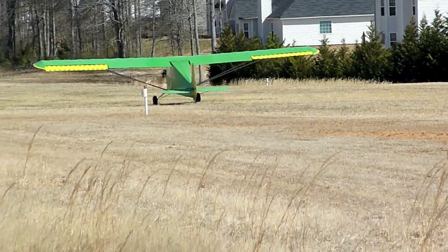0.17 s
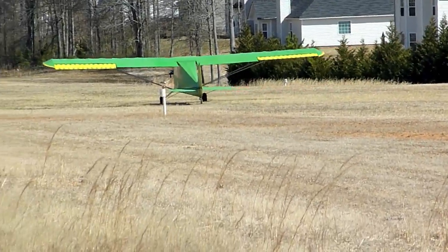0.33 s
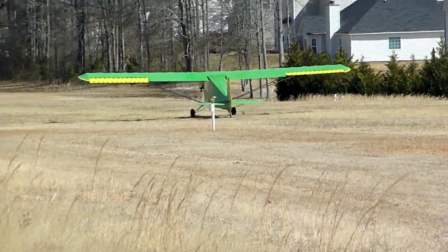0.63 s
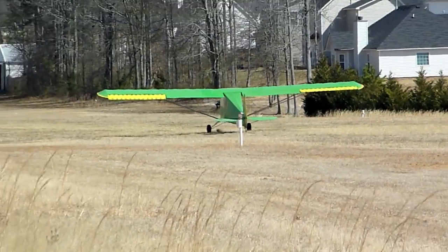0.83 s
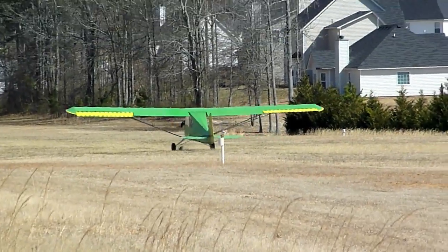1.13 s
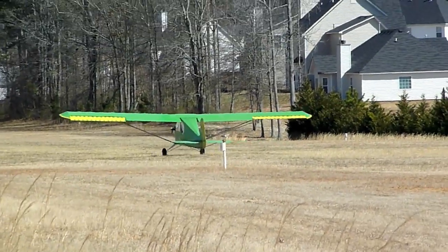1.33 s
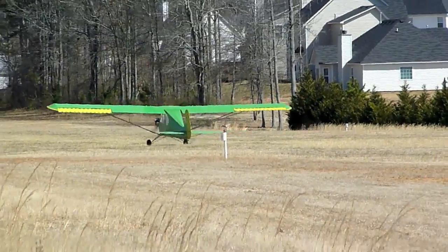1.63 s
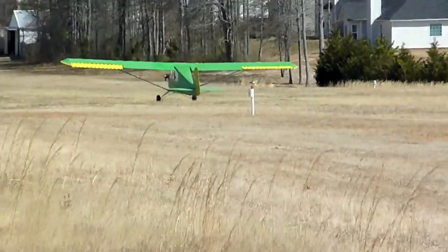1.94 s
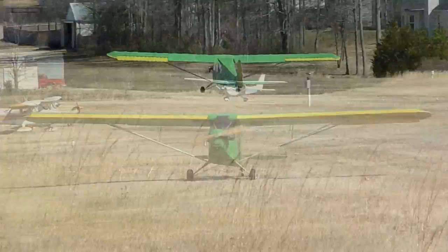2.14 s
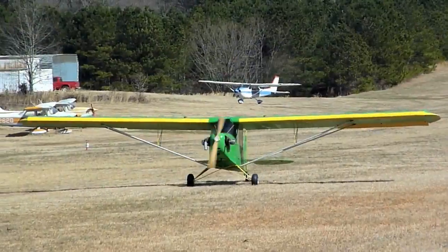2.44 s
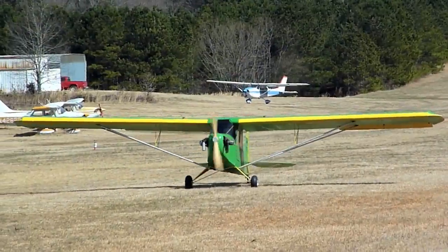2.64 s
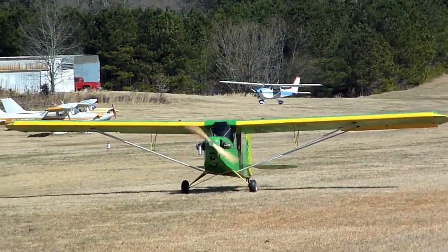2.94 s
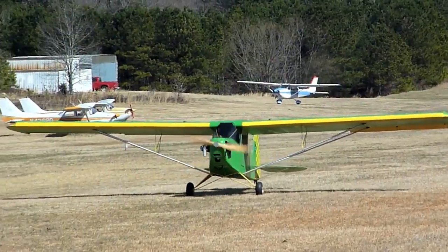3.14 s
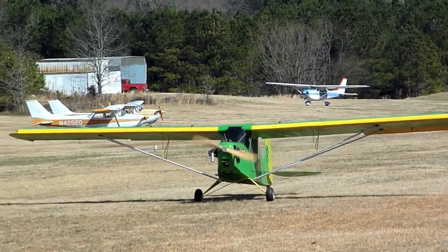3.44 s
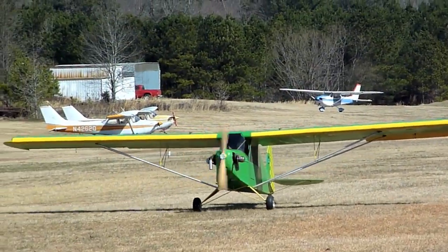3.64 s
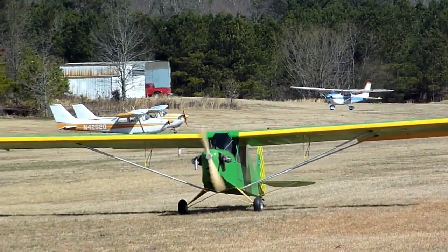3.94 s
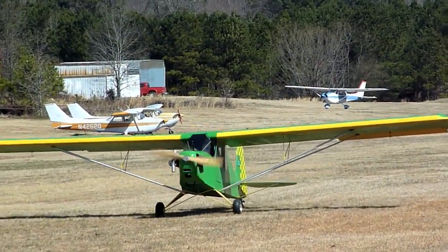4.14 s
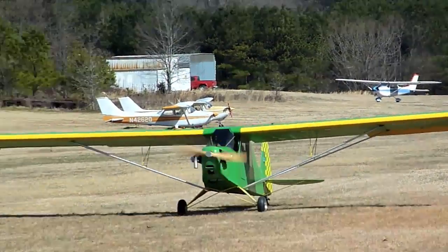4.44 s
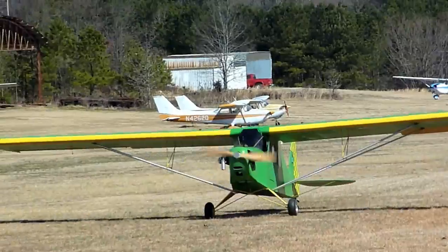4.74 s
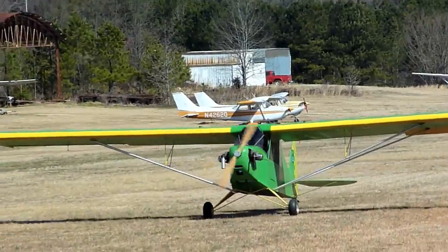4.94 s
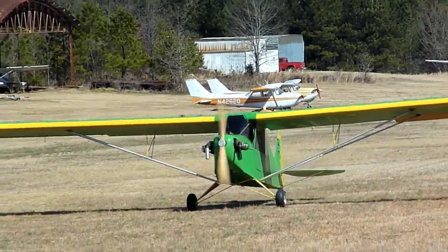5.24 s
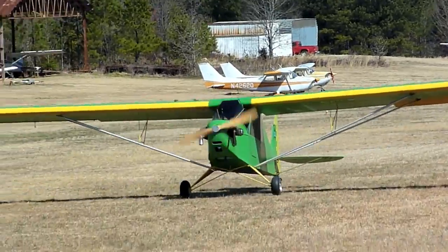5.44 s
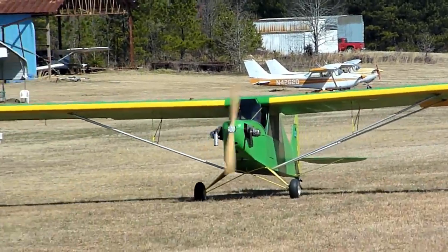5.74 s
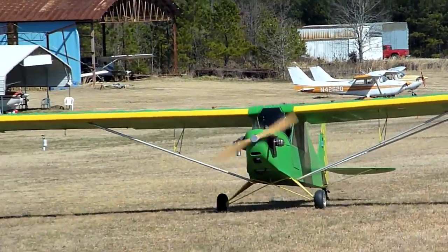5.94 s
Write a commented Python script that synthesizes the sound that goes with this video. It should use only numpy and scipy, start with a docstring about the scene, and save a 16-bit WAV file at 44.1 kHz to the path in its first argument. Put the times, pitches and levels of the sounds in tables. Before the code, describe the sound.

Far-off low engine thumping slows slightly, then switches to a nearer, brighter idling propeller plane that grows louder and crackly, with wind rumble and a knock.

```python
"""Dull, far-off thumping comes first: a light aircraft idling on a grass strip, tail-on, then nose-on and close.
Each firing of its four cylinders is a low pressure thump that sweeps upward and a short hiss of exhaust gas.
Rattling valve gear is whirring noise and gated ticks; propeller wash is noise that pulses with the firings.
Behind it, low-frequency noise gusts buffet the microphone, a faint airy hiss stays, and its case is knocked."""
import sys
import numpy as np
from scipy import signal
from scipy.fft import rfft, irfft, next_fast_len
from scipy.io import wavfile
from scipy.ndimage import uniform_filter1d, map_coordinates

SR = 44100
rng = np.random.default_rng(int(sys.argv[2]) if len(sys.argv) > 2 else 0)


def transcribe(signal):
    """Save signal, clipped to [-1, 1], as a 16-bit WAV file at the path in sys.argv[1]."""
    frames = np.atleast_2d(signal).T
    limited = np.clip(frames, -1, 1)
    pcm = np.round(limited * 32767).astype(np.int16)
    wavfile.write(sys.argv[1], SR, pcm)


N = 268994
TIME = np.arange(N) / SR  # s

# engine speed: t/s, firing rate/Hz
FIRING_RATE = [(0, 32.9), (.2, 29.3), (.33, 28.5), (.5, 27.97), (.85, 27.38), (1.95, 27.06), (2.1, 24.89),
               (2.5, 24.83), (2.9, 25.5), (3.2, 25.05), (3.5, 25.33), (3.8, 26.67), (4.1, 27.2),
               (4.9, 27.28), (6.1, 26.26)]
# exhaust thump level, which the propeller wash follows: t/s, level/dB
THUMP_LEVEL = [(0.0, -36), (0.39, -38.5), (1.19, -39), (1.27, -39.5), (1.95, -38), (2.14, -42), (2.51, -35),
               (4.13, -31), (5.78, -32.5), (6.01, -30.5), (6.1, -31)]
# in firing order, two from each bank in turn:
# thump level/dB, spit level/dB, exhaust delay/s, rocker tick delay/s, valve seating level/dB (all levels relative)
CYLINDER_TRAITS = [(-3, 2, -.0003, 0.0096, 2.5), (-3.5, 3, .00035, 0.0124, -3), (-3, 2, .00025, .012, -3),
                   (-3.5, 2.5, -.00025, 0.0112, 1.5)]
# thump colour from behind, from in front at idle, and with a little throttle:
# f/(multiple of the firing rate), relative level/dB
THUMP_BEHIND_ORDERS = [(1, -28), (2, -13.5), (3, -4), (4, -2.5), (5, -2), (6, -2), (7, 1.5), (8, -4),
                       (9, -14.5), (10, -3.5), (11, -11), (12, -14.5), (13, -20), (14, -17), (15, -38),
                       (17, -34)]
THUMP_IDLE_ORDERS = [(1, -30), (2, -23), (3, -15), (4, -12), (5, -4.5), (6, -1), (7, -1), (8, -4), (9, 2),
                     (10, -7.5), (11, -3), (12, -4.5), (13, -2), (14, -14), (15, -18.5), (16, -17),
                     (17, -27), (18, -35)]
THUMP_OPEN_ORDERS = [(1, -31), (2, -18), (3, -14.5), (4, -7), (5, -3), (6, 0), (7, 0), (8, -3), (9, -2.5),
                     (10, -2), (11, -3.5), (12, -10), (13, -4.5), (14, -9.5), (15, -25), (16, -18),
                     (17, -32), (18, -45)]
# engine treble level, shared by machinery and ordinary spits: t/s, level/dB
TREBLE_LEVEL = [(0, -73.5), (.5, -81), (1.45, -101), (2.1, -77), (2.4, -63), (2.75, -51.5), (3.3, -57),
                (4.2, -50.5), (4.55, -52), (4.92, -47.5), (5.55, -49), (6.1, -50)]
# firings whose spit stands out as a crack: t/s, level/dB, treble tilt/dB
CRACKING_SPITS = [(2.53, -52.5, 1), (2.61, -49, -2), (2.77, -46, -11), (2.809, -46.5, 0),
                  (2.888, -44.5, -6), (2.966, -46.5, -5), (3.522, -46, -4), (4.088, -43.5, 0),
                  (4.161, -42, 4), (4.235, -45.5, 8), (4.308, -45.5, 5), (4.345, -43, 9), (4.418, -44.5, 3),
                  (4.602, -45.5, -9), (4.749, -41, 0), (4.822, -40.5, 5), (4.895, -37, 2),
                  (4.932, -39.5, 0), (4.969, -41.5, 3.5), (5.006, -40.5, 0), (5.042, -38.5, 4.5),
                  (5.079, -39, 2.5), (5.116, -39, 4), (5.153, -41, 5), (5.19, -40, -2.5), (5.227, -39, 6),
                  (5.301, -41, -1.5), (5.375, -41, -5.5), (5.525, -40, -3), (5.6, -41.5, -2),
                  (5.901, -43, 0.5)]
# clearly audible tappet clicks: t/s, level/dB
TAPPET_CLICKS = [(.015, -56), (0.073, -54), (.125, -61), (.26, -61), (.33, -70), (.395, -63), (.459, -57.5),
                 (.535, -60), (.6, -61), (.742, -61), (.805, -63), (.955, -62), (1.61, -62), (1.755, -62),
                 (1.905, -60), (1.981, -59)]
# gusts on the microphone: t/s, half length/s, level/dB
GUST_SWELLS = [(0.53, 0.079, -39), (0.76, 0.098, -37.5), (1.02, 0.068, -40.5), (2.58, 0.2, -40),
               (2.72, 0.04, -38), (2.964, 0.063, -34.5), (3.403, 0.37, -41.5), (4.197, 0.065, -46),
               (4.82, 0.022, -33.5), (5.27, 0.077, -36), (5.572, 0.044, -38.5), (5.932, 0.14, -37.5)]
# small knocks on the microphone's case: t/s, rms level over 10 ms/dB, ring f/Hz, t60/s
CASE_KNOCKS = [(2.031, -49.5, 1630, 0.013), (3.8017, -35.5, 1370, 0.02), (5.904, -50.5, 1450, 0.0055)]
# noise colours of the gas jets, gears, valve covers, propeller wash, passing hiss, wind and open air:
# f/Hz, relative level/dB
SPIT_COLOUR = [(500, -27), (1500, -10.5), (2300, -2.5), (3100, 4), (3800, 3.5), (5200, -1), (6300, -0.5),
               (7000, -6.5), (10000, -11), (14000, -18.5), (16000, -30)]
GEAR_COLOUR = [(700, -13), (1800, -8), (2400, 1.5), (2900, -0.5), (3700, 3.5), (4400, -1.5), (6300, -6),
               (7800, -9.5), (10200, -12.5), (14000, -19), (16000, -47)]
VALVE_COVER_COLOUR = [(1500, -24), (2400, -7.5), (3000, -7), (3400, 3), (3660, 5.5), (4100, -7.5),
                      (6300, -15.5), (10000, -23.5), (15000, -42)]
WASH_COLOUR = [(200, -1.5), (420, 5.5), (580, -3.5), (800, 2), (1000, -4), (1400, -5), (1900, -9),
               (3000, -25), (8000, -28)]
SIZZLE_COLOUR = [(6000, -10), (8700, 0), (10700, -2), (12300, -19), (16000, -30)]
WIND_COLOUR = [(15, -55), (26, -34), (36, -9), (58, -5.5), (100, -3), (150, -4.5), (260, -14.5),
               (380, -26.5), (700, -43), (1500, -68)]
AIR_COLOUR = [(100, -23), (650, 8.5), (950, 0), (1250, 5.5), (1700, -3.5), (2500, -2.5), (4500, -6),
              (10000, -12), (14000, -14.5), (16000, -38)]
# narrow dips in the microphone's response: f/Hz, width/Hz, depth/(0 to 1)
MICROPHONE_DIPS = [(4690, 1800, 0.2), (5860, 120, 0.33), (7920, 290, 0.83)]

IDLE_HZ = 23.84  # firing rate from which wash and spit brightness grow
SPIT_DB = 1.5  # ordinary spits, over the engine treble
SPIT_BRIGHT_DB, SPIT_BRIGHT_DB_PER_HZ = -6, 1.5  # treble tilt, and its growth per extra firing a second
SPIT_BEHIND_BRIGHT_DB = 9  # extra treble tilt from behind
WHIRR_DB, VALVES_DB = -1, -6  # gears and valve ticks within the engine treble
VALVE_SEAT_S = 0.0276  # a valve seats this long after a firing
WASH_BEHIND_DB, WASH_AHEAD_DB = -23, -20.5  # wash over thump, tail-on and nose-on at idle
WASH_DB_PER_HZ = 0.57  # nose-on growth per extra firing a second
SIZZLE_S, SIZZLE_HALF_S, SIZZLE_DB = 2.545, 0.3, -59.5  # peak time, half length, level
BREEZE_DB, BREEZE_SWING_DB = -46.5, 1  # the buffeting between gusts
GROUND_LAG_S = .001319  # extra path of the turf reflection
TOP_HZ = 15600  # microphone's upper limit


def exhaust(count, cylinder_db, delay, level_db):
    """Dull thumps from behind the aircraft give way to brighter ones from in front, fuller as the throttle opens."""
    # the tail-on layer fades out at a steady speed
    held_rate = np.interp(np.minimum(TIME, 1.95), *np.transpose(FIRING_RATE))
    held_count = np.cumsum(held_rate) / SR
    behind = thumps(held_count, cylinder_db, delay, THUMP_BEHIND_ORDERS,
                    jitter=0.0044, lead=0.1113, sweep=0.0528, echo_db=-9.5)
    idle = thumps(count, cylinder_db, delay, THUMP_IDLE_ORDERS,
                  jitter=0.0046, lead=0.1616, sweep=0.0552, echo_db=-9.5)
    opened = thumps(count, cylinder_db, delay, THUMP_OPEN_ORDERS,
                    jitter=0.003, lead=0.155, sweep=0.054, echo_db=-18)
    airframe_shade = [(240, 0), (285, -1), (330, -6.5), (600, -10)]
    behind = unit(filtered(behind, lambda hz: colour(airframe_shade, hz)))
    near = facing(TIME)
    throttle = np.interp(TIME, [3.45, 4.0], [0, 1])
    ahead = (1 - throttle) * idle + throttle * opened
    return amp(level_db) * (np.sqrt(1 - near) * behind + np.sqrt(near) * ahead)


def thumps(count, db, delay, orders, jitter, lead, sweep, echo_db):
    """Exhaust pressure waves, fixed in crank angle; delay is in seconds, jitter and lead in firing periods."""
    period = TIME[-1] / count[-1]
    size, shift, echo_shift = rng.standard_normal((len(db), 3)).T
    at = np.arange(len(db)) - lead + jitter * shift
    main = pulses(at * period + delay, db + 0.62 * size)
    # a weaker second puff
    after = pulses((at + 0.5207 + 0.013 * echo_shift) * period, db - 13)
    # scattered back by the tree line
    echoes = pulses((at + .65 + 0.223 * echo_shift) * period, db + echo_db)
    shape = np.vstack([(0, -70), (.8, -40), orders, (21, -50), (40, -100)])

    def chirp(hz):
        """Each higher order lags by sweep periods more, so every thump sweeps upward."""
        order = hz * period
        return -colour(shape, order) * np.exp(-1j * np.pi * sweep * order ** 2)

    steady = filtered(main + after + echoes, chirp)
    return unit(np.interp(count * period, TIME, steady))  # stretched to follow the engine's speed


def spits(times, cylinder_db, size=1024):
    """Gas jets out as each exhaust valve cracks open; every jet has its own strength, length and colour."""
    strength_db, bright_db = spit_strengths(times, cylinder_db)
    shots = len(times)
    t = (np.arange(size) - size // 2) / SR
    hz = np.fft.rfftfreq(size, 1 / SR)
    # the jet opens quickly, sputters while the port is choked, then dies
    age = t * np.exp(0.13 * rng.standard_normal((shots, 1)))
    sputter = unit(uniform_filter1d(rng.standard_normal((shots, size)), size // 48, axis=1))
    opening = np.tanh((age + 0.0015) / 0.0004) + 1
    dying = 1 + np.exp((age - .001) / 0.0017)
    gate = opening / dying * amp(2 * sputter)
    # uneven patches of colour, different in every jet
    smoother = np.hanning(size // 32)[None]
    patches = unit(signal.fftconvolve(rng.standard_normal((shots, len(hz))), smoother, "same", axes=1))
    tilt_db = bright_db[:, None] * np.tanh(np.log((hz + 1) / 4800) / .5) * 0.78
    jet_spectra = rfft(gate * rng.standard_normal((shots, size)))
    jets = irfft(jet_spectra * colour(SPIT_COLOUR, hz) * amp(tilt_db + 2.3 * patches))
    period = SR * np.diff(times).mean()  # samples; strengths are rms over one firing
    jets *= (amp(strength_db) * np.sqrt(period) / np.linalg.norm(jets, axis=1))[:, None]
    at = np.round(times * SR).astype(int)[:, None] + np.arange(size)
    joined = np.bincount(np.maximum(at, 0).ravel(), jets.ravel(), N + size)[size // 2:][:N]
    mono = off_ground(joined, share=0.23)

    def case_bounce(hz):
        """A bright, slightly late reflection off the microphone's case."""
        return colour([(3000, -50), (8000, -7)], hz) * np.exp(-2j * np.pi * hz * 0.000417)

    glance = filtered(mono, case_bounce)
    return np.array([mono + glance, mono - glance]) * amp([[-.3], [.3]])


def spit_strengths(times, cylinder_db):
    """Level and treble tilt of each firing's spit: they follow the engine, except where one cracks."""
    near = facing(times)
    behind = 1 - near
    size, tone = rng.standard_normal((len(times), 2)).T
    hidden_db = -9 * (np.arange(len(times)) % 2) * behind  # from behind, the fuselage masks every other spit
    treble_db = np.interp(times, *np.transpose(TREBLE_LEVEL))
    level_db = treble_db + SPIT_DB + cylinder_db + hidden_db + 1.2 * size
    extra_rate = np.interp(times, *np.transpose(FIRING_RATE)) - IDLE_HZ
    bright_db = SPIT_BRIGHT_DB + near * SPIT_BRIGHT_DB_PER_HZ * extra_rate
    bright_db = bright_db + SPIT_BEHIND_BRIGHT_DB * behind + 2.5 * tone
    for s, db, tilt_db in CRACKING_SPITS:
        k = np.argmin(abs(times - s))
        level_db[k], bright_db[k] = db, tilt_db
    return level_db, bright_db


def machinery(times, rocker_delay, seat_db, level_db):
    """Gears whirr; between firings a rocker ticks and a valve seats, both ringing the metal valve covers."""
    rocker, seat = 4.3 * rng.standard_normal((len(times), 2)).T
    tick_times = np.r_[times + rocker_delay, times + VALVE_SEAT_S]
    ticks = bursts(tick_times, np.r_[rocker, seat + seat_db], rise=0.0018, fall=0.0041)
    valves = amp(VALVES_DB) * rush(VALVE_COVER_COLOUR, width=0.28, gate=ticks)
    whirr = amp(WHIRR_DB) * off_ground(rush(GEAR_COLOUR, width=0.47), share=0.093)
    return amp(level_db) * (valves + whirr)


def tappets():
    """Now and then a tappet clicks clearly: a brief gated burst of noise around 2.6 kHz."""
    s, db = np.transpose(TAPPET_CLICKS)
    swell = bursts(s, db, rise=0.0025, fall=0.0051)
    click_colour = [(1200, -23), (2200, -6), (2600, 1), (3100, -5), (5000, -29)]
    return amp(db.max()) * swell / swell.max() * rush(click_colour, width=0.78)


def propeller(times, level_db):
    """The wash of the two blades swells in step with the firings."""
    swell = bursts(times + 0.00078, 2.8 * rng.standard_normal(len(times)), rise=0.0036, fall=0.007)
    return amp(level_db) * rush(WASH_COLOUR, width=0.095, gate=1 + 0.4 * swell)


def sizzle():
    """A thin high hiss comes and goes around the change from tail-on to nose-on."""
    swell = swells([(SIZZLE_S, SIZZLE_HALF_S)], TIME)
    return amp(SIZZLE_DB) * swell * rush(SIZZLE_COLOUR, width=0.99)


def knocks():
    """Each knock is a dry clack through the microphone's case, which shakes its two ports against each other."""
    out = np.zeros((2, N))
    for s, db, ring_hz, t60 in CASE_KNOCKS:
        age = np.maximum(TIME - s, 0)
        gate = amp(-60 * age / t60) * (1 - np.exp(-age / 0.00089))
        case = [(ring_hz / 4, -3), (ring_hz, 0), (ring_hz * 1.4, -5),
                (ring_hz * 2.1, -9), (ring_hz * 4.7, -20), (ring_hz * 10, -31)]
        crack = filtered(gate * rng.standard_normal((2, N)), lambda hz: colour(case, hz))
        crack /= np.linalg.norm(crack, axis=1, keepdims=True)
        mid, side = crack * np.sqrt(SR / 100)  # rms 1 over 10 ms
        shake = filtered(side, lambda hz: colour([(600, -13), (1500, 4), (4000, 8)], hz))
        out += amp(db) * (mid + np.outer([1, -1], shake))
    return out


def wind():
    """Gusts buffet each microphone port separately, over a faint hiss of open air."""
    lumps = amp(0.61 * np.array([wobble(24), wobble(23.58)]))
    breeze = amp(BREEZE_DB + BREEZE_SWING_DB * wobble(5.07))
    gusts = amp(np.array(GUST_SWELLS)[:, 2]) @ swells(GUST_SWELLS, TIME)
    buffeting = np.hypot(breeze, gusts) * unit(lumps * rush(WIND_COLOUR, width=0.45))
    return buffeting + amp(-61) * rush(AIR_COLOUR, width=1.0)


def firings():
    """Firings counted at each sample, their times, and the cylinder columns that go with them."""
    count = np.cumsum(curves(FIRING_RATE)[0]) / SR
    k = np.arange(int(count[-1]) + 1)
    traits = np.array(CYLINDER_TRAITS)[k % len(CYLINDER_TRAITS)].T
    return count, np.interp(k, count, TIME), traits


def facing(times):
    """0 while only the tail-on sound plays, 1 once only the nose-on sound does; in between, one view crossfades
    into the other."""
    return np.interp(times, [1.95, 2.4], [0, 1])


def off_ground(x, share):
    """The sound plus its delayed reflection from the turf, scaled to keep the power about even."""
    return filtered(x, lambda hz: 1 + share * np.exp(-2j * np.pi * hz * GROUND_LAG_S)) / np.hypot(1, share)


def swells(rows, times):
    """One bell-shaped swell of height 1 for each row of t/s, half length/s."""
    s, length = np.transpose(rows)[:2, :, None]
    return np.exp(-((times - s) / length) ** 2)


def bursts(times, db, rise, fall):
    """An envelope of rms 1 that swells to each time and dies away; rise and fall are in seconds."""
    t = np.arange(-SR // 20, SR // 20 + 1) / SR
    shape = np.exp(np.minimum(t / rise, -t / fall))
    return unit(signal.fftconvolve(pulses(times, db), shape, "same"))


def pulses(times, db):
    """One impulse at each time."""
    at = np.clip(np.round(times * SR).astype(int), 0, N)
    return np.bincount(at, amp(db), N + 1)[:N]


def rush(spectrum, width, gate=1):
    """Gated, coloured stereo noise of rms 1; width is side over mid."""
    mid, side = filtered(gate * rng.standard_normal((2, N)), lambda hz: colour(spectrum, hz))
    return unit(np.array([mid + width * side, mid - width * side]))


def filtered(x, response):
    """x times a complex response of frequency."""
    m = next_fast_len(N + SR // 2)
    return irfft(rfft(x, m) * response(np.fft.rfftfreq(m, 1 / SR)), m)[..., :N]


def colour(points, hz):
    """Gain from f, level/dB points joined on a log frequency axis."""
    f, db = np.transpose(points)
    return amp(np.interp(np.log(hz + 1), np.log(f + 1), db))


def curves(rows):
    """One value per sample for each column after the time."""
    s, *cols = np.transpose(rows)
    return [np.interp(TIME, s, c) for c in cols]


def wobble(rate):
    """A smooth random curve, rate knots a second."""
    return map_coordinates(rng.standard_normal(int(N * rate / SR) + 4), [TIME * rate])


def amp(db):
    """Decibels to gain."""
    return 10 ** (np.asarray(db) / 20)


def unit(x):
    """Scaled to rms 1."""
    return x / np.sqrt(np.mean(x ** 2) + 1e-20)


def scene():
    """The aircraft a little to the right, wind and knocks at the microphone."""
    count, times, (cylinder_db, spit_db, delay, rocker_delay, seat_db) = firings()
    (rate,), (thump_db,), (treble_db,) = curves(FIRING_RATE), curves(THUMP_LEVEL), curves(TREBLE_LEVEL)
    near = facing(TIME)
    wash_ahead_db = WASH_AHEAD_DB + WASH_DB_PER_HZ * (rate - IDLE_HZ)
    wash_db = thump_db + (1 - near) * WASH_BEHIND_DB + near * wash_ahead_db
    engine = exhaust(count, cylinder_db, delay, thump_db) + spits(times + delay, spit_db)
    engine = engine + machinery(times, rocker_delay, seat_db, treble_db)
    aircraft = engine + tappets() + propeller(times, wash_db)
    return aircraft * amp([[-.4], [.4]]) + wind() + sizzle() + knocks()


def record(dry):
    """The microphone notches the treble and keeps nothing above its band limit."""
    def response(hz):
        """Product of the dips, cut off at the top."""
        dips = [1 - depth / (1 + (2 * (hz - centre) / width) ** 2) for centre, width, depth in MICROPHONE_DIPS]
        return np.prod(dips, axis=0) * (hz < TOP_HZ)

    return filtered(dry, response)


dry = scene()
out = record(dry)
transcribe(out)
```